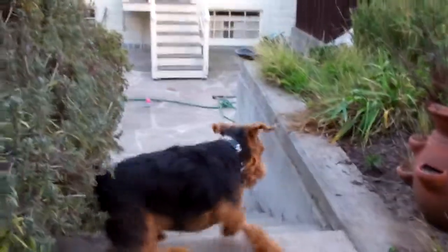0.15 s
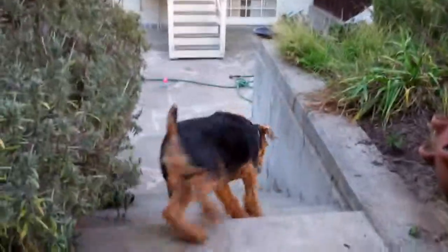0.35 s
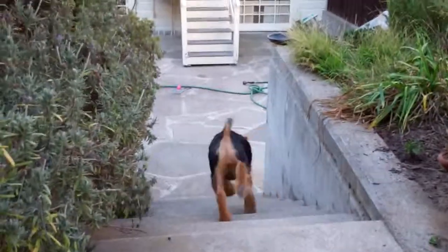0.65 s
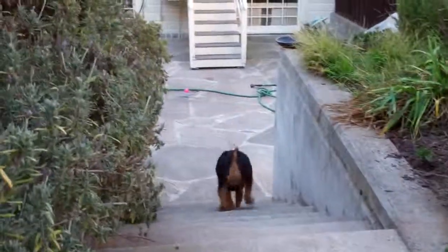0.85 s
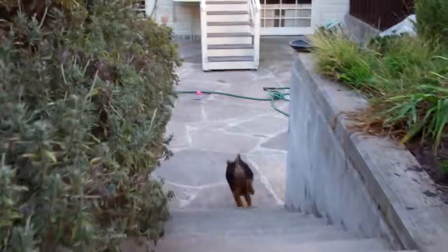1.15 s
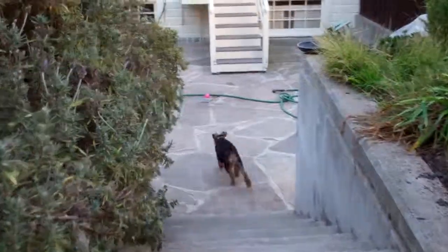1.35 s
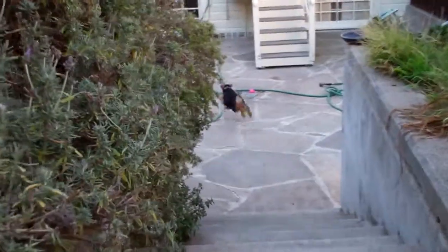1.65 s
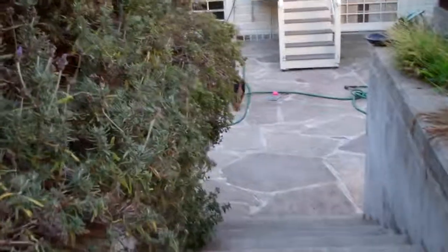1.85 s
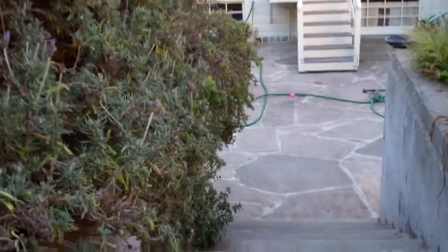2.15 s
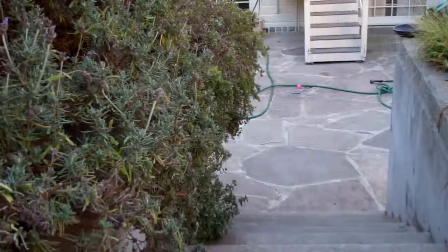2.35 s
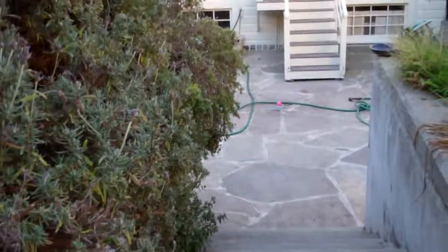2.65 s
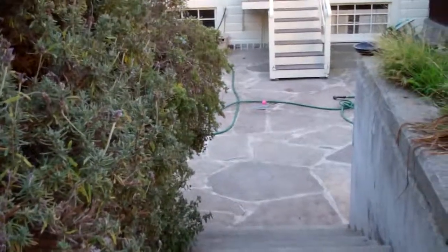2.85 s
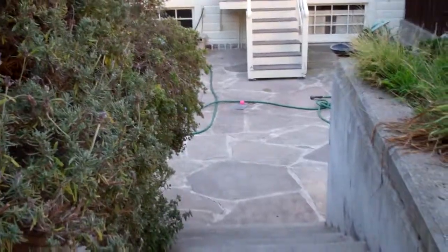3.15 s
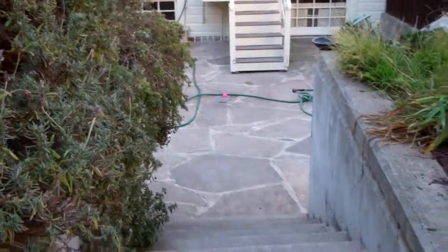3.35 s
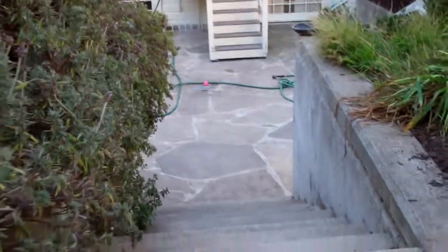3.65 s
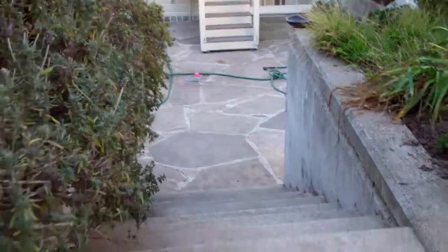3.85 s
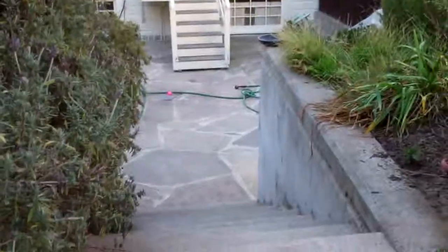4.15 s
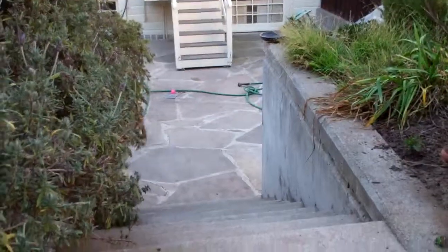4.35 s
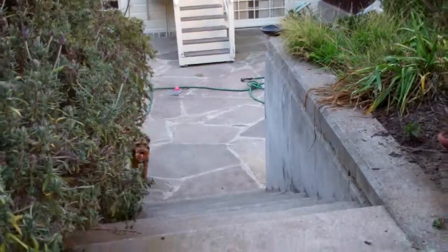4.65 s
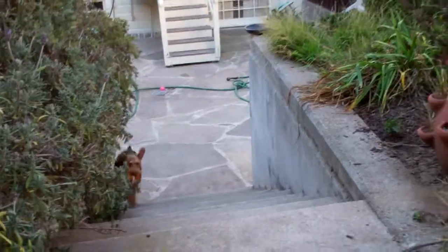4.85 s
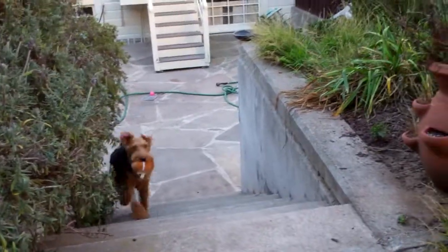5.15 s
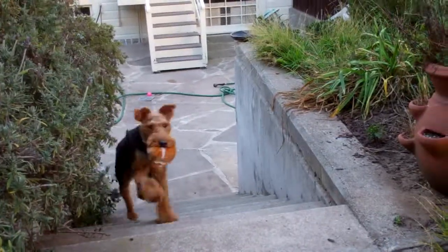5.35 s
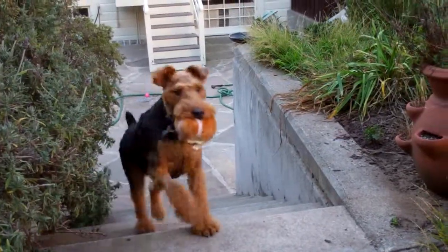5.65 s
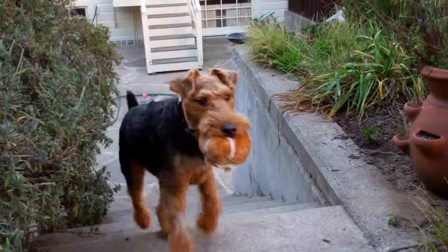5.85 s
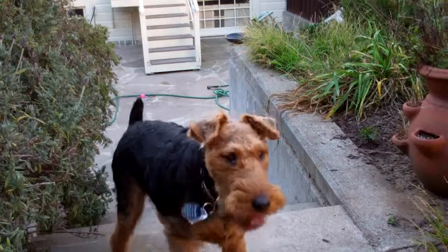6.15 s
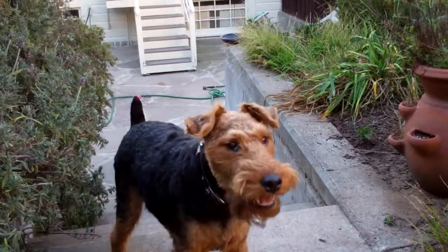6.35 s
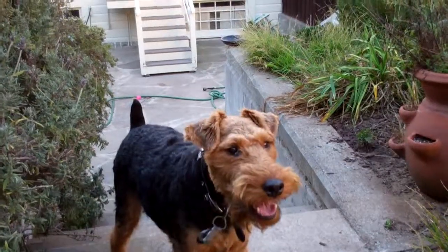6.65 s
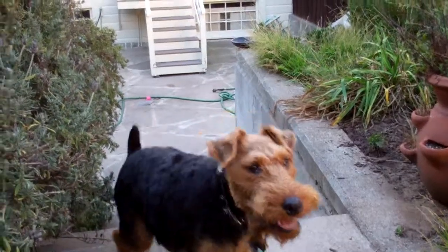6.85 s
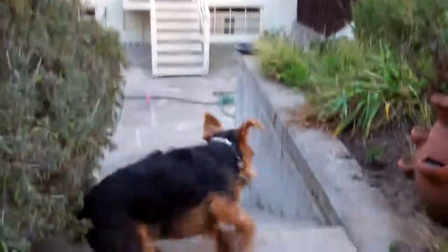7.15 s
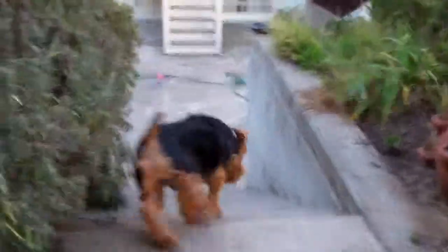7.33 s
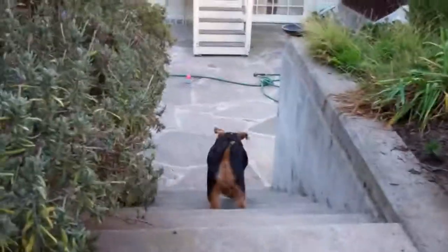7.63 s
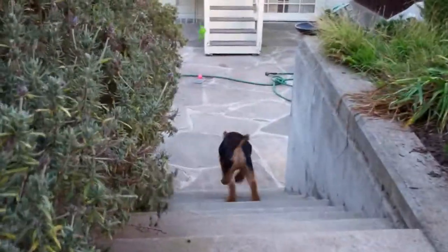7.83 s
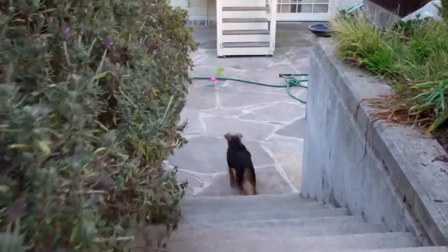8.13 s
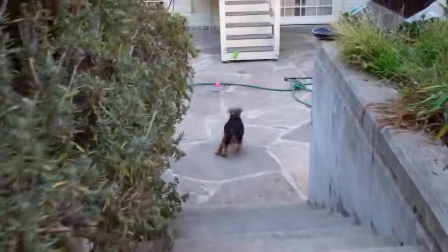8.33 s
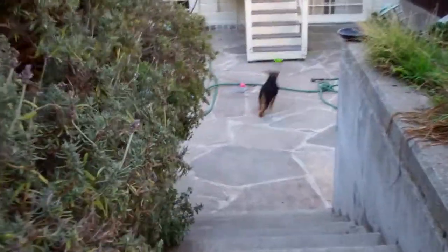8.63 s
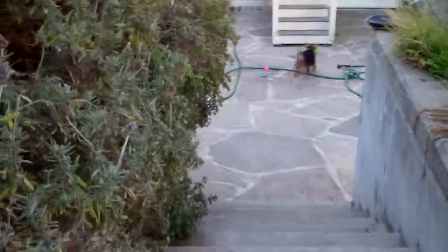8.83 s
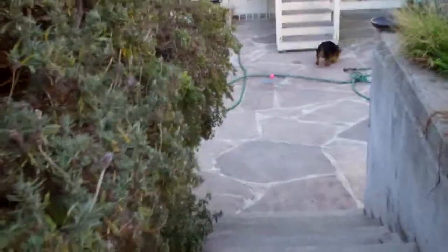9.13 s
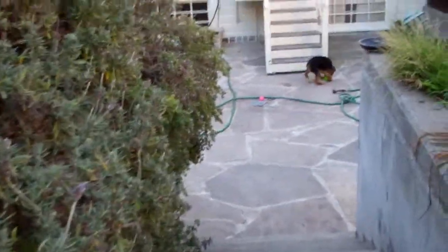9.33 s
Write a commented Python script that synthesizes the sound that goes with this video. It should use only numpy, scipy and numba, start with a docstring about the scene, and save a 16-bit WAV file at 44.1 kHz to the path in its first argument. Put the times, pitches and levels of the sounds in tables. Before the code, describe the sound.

High, thin jingling from a dog's collar tags stands out over faint distant traffic in a small yard. Claws click and paws brush gritty stone as the dog moves. About a third of the way in, a toy squeaks briefly, and then the dog yips once. After a busy run of clinks the tags rest for a moment, then rattle again with dull paw landings and a quick scrape.

```python
"""Metal collar tags clink and rattle over a hum of distant traffic, which dips briefly after loud bursts.
A terrier is fetching a toy up and down stone garden steps between a wall and a bush. The tags are struck
plates ringing in their modes; claws tick by impact and paws scuff by friction on the stone. The bitten toy
squeaks as air drives its reed, the dog yips once and skids once, and the yard adds a short reverberation."""
import sys
import numpy as np
from scipy import signal
from scipy.io import wavfile
from scipy.ndimage import uniform_filter1d
from numba import njit

SR = 44100
rng = np.random.default_rng(int(sys.argv[2]) if len(sys.argv) > 2 else 0)


def unload_wav(signal):
    """Save mono or channel-first audio to the path in sys.argv[1] as 16-bit WAV at rate SR, clipped to [-1, 1]."""
    wavfile.write(
        sys.argv[1],
        SR,
        np.round(np.clip(np.atleast_2d(signal).T, -1, 1) * 32767).astype(np.int16),
    )


N = 418509
TIME = np.arange(N) / SR


def undb(db):
    return 10 ** (np.asarray(db) / 20)


def unit(x):
    return x / np.sqrt(np.mean(x ** 2))


def noise(*shape):
    return rng.standard_normal(shape)


def band(x, lo_hz, hi_hz):
    sos = signal.butter(2, [lo_hz, min(hi_hz, .45 * SR)], "bandpass", fs=SR, output="sos")
    return signal.sosfilt(sos, x)


def phase_of(hz):
    return 2 * np.pi * np.cumsum(hz) / SR


def walk(rate):
    """Random modulation: values held for 1 / rate s and smoothed twice; spread near 1."""
    k = int(SR / rate)
    steps = np.repeat(noise(N // k + 1), k)
    return 1.7 * uniform_filter1d(uniform_filter1d(steps, k), k)[:N]


def grains(per_s, spread_db):
    """Shot noise: sparse stereo clicks, a few much larger than the rest; rms 1."""
    hit = rng.random(N) < per_s / SR
    size = hit * undb(spread_db * rng.exponential(size=N))
    return unit(size * (noise(N) + .5 * noise(2, N)))


def bursts(rows, slope_db, swell=0):
    """Envelope of (t/s, length/s, level/dB) rows, each changing by slope_db; swell slows long onsets."""
    gain = 0
    for start, length, db in rows:
        age = TIME - start
        gate = np.clip(np.minimum(age / (.00043 + swell * length ** 2), (length - age) / .0013), 0, 1)
        gain += undb(db + slope_db * np.clip(age / length, 0, 1)) * gate
    return gain


# Dips in level after loud bursts: t/s, depth/dB
LEVEL_DIPS = [(0.249, -11.5), (.49, -11.5), (.92, -5), (1.282, -5.5), (2.40, -2.5), (4.40, -3.5),
              (4.68, -4.5), (5.14, -4.5), (5.309, -8.5), (5.884, -10.5), (6.72, -1), (7.23, -5),
              (7.42, -4.5), (7.649, -4.5), (7.836, -10), (8.361, -9)]
def dips(fall_s=.0024, hold_s=.12, return_db_s=40):
    """Amplitude modulation: the gain drops at once, holds, then returns linearly in dB."""
    shapes = []
    for start, db in LEVEL_DIPS:
        recovery_db = return_db_s * np.maximum(TIME - start - hold_s, 0)
        shapes.append(np.clip((TIME - start) / fall_s, 0, 1) * np.minimum(db + recovery_db, 0))
    return undb(np.min(shapes, axis=0))


# Traffic spectrum: f/Hz, relative spectral density/dB
TRAFFIC_SPECTRUM = [(30, -50), (60, -5), (194, -3), (396, -5.5), (810, -1), (2230, -16), (2650, -18),
                    (6750, -26.5), (14500, -21.5)]
# Likeness of the two sides: f/Hz, left-right correlation
TRAFFIC_CORRELATION = [(30, 0.75), (100, 0.99), (300, .95), (700, 0.89), (2000, 0.42), (5000, 0.21),
                       (14000, 0.14)]
# Low hums: start t/s, end t/s, f/Hz, level/dB re the traffic
TRAFFIC_HUMS = [(1.0, 5.37, 82.95, -10), (6.1, 6.75, 208.4, -5)]
def traffic(level_db=-42):
    """Partial coherence: flickering half-octave noise bands, most alike in the bass, with faint hums."""
    def at_pitch(table, hz):
        freqs, values = np.transpose(table)
        return np.interp(np.log(hz), np.log(freqs), values)

    out = 0
    for hz in 56 * 2 ** np.arange(0, 8.1, .5):
        alike = at_pitch(TRAFFIC_CORRELATION, hz)
        mid, side = band(noise(2, N), hz / 2 ** .25, hz * 2 ** .25)
        pair = np.sqrt(1 + alike) * mid + np.sqrt(1 - alike) * np.array([side, -side])
        out += undb(at_pitch(TRAFFIC_SPECTRUM, hz) + 1.2 * walk(9)) * pair
    out /= np.sqrt(np.mean(band(out.mean(axis=0), 300, 1300) ** 2))  # unit rms in the midrange
    for start, end, hz, db in TRAFFIC_HUMS:
        swell = np.clip(np.minimum(TIME - start, end - TIME) / (.12 * (end - start)), 0, 1)
        out += undb(db + 2 * walk(8)) * swell * np.sin(phase_of(hz * (1 + .015 * walk(4))))
    return out * undb(level_db) * dips()


# Shakes of the collar: t/s, hold/s, level/dB
COLLAR_SHAKES = [(.15, 0.013, -28.5), (.32, 0.011, -23), (0.429, 0.037, -18.5), (.62, 0.0072, -22),
                 (0.737, 0.1, -28.5), (.905, 0.14, -27.5), (1.03, 0.41, -26), (1.52, 0.062, -30),
                 (1.735, 0.081, -27), (1.91, 0.016, -27.5), (2.029, 0.035, -24), (2.18, 0.011, -34.5),
                 (2.261, 0.4, -30.5), (2.81, 0.026, -28), (2.895, 0.065, -24.5), (3.109, 0.11, -23),
                 (3.412, 0.026, -29), (3.45, 0.029, -28), (3.71, 0.19, -37.5), (3.87, 0.042, -34),
                 (4.05, 0.021, -32.5), (4.11, 0.087, -31.5), (4.21, 0.015, -37), (4.359, 0.19, -26.5),
                 (4.47, 0.47, -29), (5.06, 0.4, -31.5), (7.2, 0.021, -26), (7.64, 0.49, -25.5),
                 (8.083, 0.19, -20.5), (8.358, 0.022, -16), (8.42, 0.26, -25), (8.612, 0.12, -26.5),
                 (8.78, 0.34, -27), (9.005, 0.1, -27.5), (9.17, 0.028, -23.5)]
def shaking_db(rest_db=-48.5, rise_db_s=790, fall_db_s=143):
    """Incoherent addition: shakes rise, hold and decay, summed in power; they dip with the traffic."""
    power = undb(2 * rest_db)
    for start, hold, db in COLLAR_SHAKES:
        onset_db = rise_db_s * np.maximum(start + .0041 - TIME, 0)
        decay_db = fall_db_s * np.maximum(TIME - start - hold, 0)
        power += undb(2 * (db - onset_db - decay_db))
    return 10 * np.log10(power * dips() ** 2)


# Paws scuffing over grit: t/s, length/s, level/dB, treble/dB re that level
PAW_SCUFFS = [(0.164, 0.067, -55, 5), (0.234, 0.026, -33.5, 13.5), (0.322, 0.017, -45.5, 12),
              (0.433, 0.022, -36, 15), (6.114, 0.059, -61, 21), (6.313, 0.013, -58, 19.5),
              (6.943, 0.065, -60, 24.5), (7.01, 0.16, -35, 13), (7.215, 0.072, -40.5, 13.5),
              (7.307, 0.044, -42.5, 10.5), (7.416, 0.018, -30.5, 13.5), (9.099, .07, -44.5, 14),
              (9.29, 0.15, -48, 20.5)]
# Dull landings: t/s, length/s, level/dB
PAW_LANDINGS = [(7.2, 0.03, -37.5), (8.108, 0.022, -28), (8.126, 0.035, -28), (8.158, 0.032, -32.5),
                (8.188, 0.076, -38), (8.625, 0.013, -29), (9.09, 0.076, -40.5)]
def paws(swell=3.4):
    """Friction and impact noise: scuffs are grit clicks over a hiss, landings a low, gritty rumble."""
    grit = (grains(4000, spread_db=2.5) + .45 * noise(2, N)) * undb(1.2 * walk(120))
    scuffs = [row[:3] for row in PAW_SCUFFS]
    # a duller scuff drags more of the pad, which sounds lower
    dull = [(start, length, db - treble_db + .5) for start, length, db, treble_db in PAW_SCUFFS]
    bright = [(start, length, db + treble_db) for start, length, db, treble_db in PAW_SCUFFS]
    body = bursts(scuffs, slope_db=-1, swell=swell) * unit(band(grit, 1760, 5500))
    drag = bursts(dull, slope_db=10, swell=swell) * unit(band(grit, 1560, 5200))
    treble = bursts(bright, slope_db=-3.5, swell=swell / 2) * unit(band(grit, 8200, 20000))
    # whenever the collar shakes the dog is moving, and the pads brush the stone
    brush = undb(shaking_db() - 19.5) * unit(band(grit, 1550, 7600))
    knocks = grains(1100, spread_db=3).mean(axis=0)
    rumble = unit(band(band(knocks, 110, 900), 140, 800))
    landings = bursts(PAW_LANDINGS, slope_db=-5) * (rumble + .3 * unit(band(grit, 1200, 4200)))
    return body + drag + brush - treble + landings


# Claws striking stone: t/s, relative level/dB, f/Hz
CLAW_TICKS = [(0.399, -30.5, 2760), (1.405, -11.5, 10500), (1.223, -23.5, 4500), (1.493, -21, 7050),
              (1.5777, -26.5, 4000), (1.787, -22.5, 2100), (4.332, -26, 6400), (4.554, -29, 7000),
              (4.615, -30.5, 7000), (4.656, -29, 8040), (5.016, -21, 6700), (6.223, -25.5, 7250),
              (6.616, -29, 7140), (6.721, -15, 5470), (6.8328, -28.5, 2480), (6.8496, -23, 6600),
              (6.8847, -25.5, 6570), (7.079, -15, 6600), (7.102, -17, 3840), (7.466, -31, 2700),
              (7.572, -31, 8040), (7.815, -14, 7900), (8.105, -18.5, 2660), (8.258, -25, 4500),
              (8.2918, -22.5, 4530), (8.339, -22, 6760), (8.627, -15, 6300)]
def claws(size=2048, decay_s=.0009):
    """Impact transients: each tick is a few ms of noise, coloured round its own pitch."""
    out, t = np.zeros((2, N + size)), TIME[:size]
    for start, db, hz in CLAW_TICKS:
        impact = (noise(size) + .057 * noise(2, size)) * t * np.exp(-t / decay_s)
        tick = band(impact, .55 * hz, 2.2 * hz)
        at = int(start * SR)
        out[:, at:at + size] += undb(db + 3) * tick / np.abs(tick).max()
    return out[:, :N]


# One hard skid: t/s, length/s, level/dB
PAW_SKID = [(8.938, 0.024, -20.5)]
def skid(from_hz=2600, to_hz=1133):
    """Sliding friction: bright grit fades while a rough tone falls in pitch and swells."""
    start, length, _ = PAW_SKID[0]
    hz = np.interp(TIME, [start, start + length], [from_hz, to_hz])
    slide = np.sin(phase_of(hz * (1 + .11 * walk(1500)))) * undb(2.7 * walk(600) - 7.5)
    grit = unit(band(grains(6500, spread_db=1.1), 1340, 4800))
    return bursts(PAW_SKID, slope_db=-1.5) * grit + bursts(PAW_SKID, slope_db=8) * slide


# One short yip: t/s, length/s, level/dB
DOG_YIP = [(4.074, 0.064, -31)]
def yip(band_hz=(1420, 2140)):
    """Narrow-band noise: a fading burst, heard as a rough pitch."""
    return bursts(DOG_YIP, slope_db=-14) * unit(band(band(noise(N), *band_hz), *band_hz))


# Squeak contours, one list each: t/s, f/Hz, relative level/dB, breathiness (0-1)
TOY_SQUEAKS = [
    [(2.525, 1370, -49, 0.34), (2.545, 1600, -49, 0.4), (2.562, 1860, -41.5, 0.32),
     (2.597, 1890, -32.5, 0.2), (2.606, 2320, -35, 0.24), (2.616, 2250, -31.5, 0.54),
     (2.624, 1930, -38, 0.76), (2.66, 1920, -41.5, 0.68), (2.70, 1900, -48, 0.6), (2.722, 1850, -50, 0.7)],
    [(2.722, 1200, -50, 0.3), (2.75, 1235, -46, 0.09), (2.79, 1295, -44, 0.14), (2.815, 1300, -41.5, 0.15),
     (2.86, 1300, -51, 0), (2.905, 1306, -55, 0.05)],
    [(3.035, 1300, -60, .4), (3.048, 1550, -39, .4), (3.058, 2200, -36, .4), (3.07, 3650, -35, .3),
     (3.08, 3750, -32, .12), (3.097, 4050, -32, .12), (3.10, 4550, -31, .08), (3.134, 4520, -35, .1),
     (3.14, 4500, -60, .2)],
    [(3.134, 2420, -46, 0.46), (3.142, 2280, -35.5, 0.74), (3.158, 1900, -41.5, 1), (3.20, 2060, -44.5, 1),
     (3.245, 2040, -57, 0.97)],
]
# Reed harmonics 1-11: relative level/dB
REED_HARMONICS = [0.0, -1, -4, -3, -8, -4, -13, -14, -14, -13, -13]
def toy():
    """Reed oscillation: strong harmonics, smeared by pitch jitter as air leaks past the reed."""
    hz, db, breath = np.zeros(N), np.full(N, -120.), np.zeros(N)
    for times, *columns in map(np.transpose, TOY_SQUEAKS):
        on = (TIME >= times[0]) & (TIME <= times[-1])
        hz[on], db[on], breath[on] = [np.interp(TIME[on], times, column) for column in columns]
    phase = phase_of(hz * (1 + .1 * breath * walk(1500) + .005 * walk(150)))
    reed = 0
    for k, harmonic_db in enumerate(REED_HARMONICS, 1):
        ceiling_hz = 14000 - 12000 * breath if k > 6 else 8500
        reed += undb(harmonic_db + 2.57 * walk(150)) * np.sin(k * phase) * (k * hz < ceiling_hz)
    leak = unit(band(band(noise(N), 6000, 7500), 6000, 7800))
    gain = undb(db + .3 * walk(120))
    hiss = unit(band(noise(N), 1200, 9400))
    return gain * (2.18 * reed + 3.6 * breath * leak + .92 * hiss)


def contact_clicks(at, db, decay_s, lo_hz):
    """Impulsive excitation: each brief contact gives a broadband click that decays exponentially."""
    pulses = np.zeros(N)
    np.add.at(pulses, at, undb(db))
    envelope = signal.lfilter([1], [1, -np.exp(-1 / (decay_s * SR))], pulses)
    return band(envelope * (noise(N) + .98 * noise(2, N)), lo_hz, 20400)


@njit
def add_mode(out, at, pole, push):
    """Damped oscillation: each blow adds a sinusoid to out, run until it is 40 dB down."""
    for k in range(len(at)):
        z, i = 1. + 0j, at[k]
        while i < out.shape[1] and z.real ** 2 + z.imag ** 2 > 1e-4:
            out[0, i] += (push[k, 0] * z).imag
            out[1, i] += (push[k, 1] * z).imag
            z, i = z * pole[k], i + 1


def plate(at, db, modes, scatter_db, t60_scale, detune):
    """Modal superposition: each blow lands elsewhere and shares its energy anew among the modes."""
    out, mode_db = np.zeros((2, N)), np.array(modes)[:, 1]
    # the tag then hangs freely or lies damped on its neighbour
    freedom = t60_scale * np.exp(.5 * np.minimum(noise(len(at)), 1))
    shares = undb(mode_db + scatter_db * np.minimum(noise(len(at), len(modes)), 1.3))
    shares *= np.linalg.norm(undb(mode_db)) / np.linalg.norm(shares, axis=1, keepdims=True)
    for (hz, _, t60), share in zip(modes, shares.T):
        chance = noise(len(at), 6)
        pitch_hz = hz * (1 + detune * chance[:, 0])
        damping = np.log(1000) / np.clip(t60 * freedom, .005, .4)
        pole = np.exp((2j * np.pi * pitch_hz - damping) / SR)
        # a swinging plate beams each mode differently to the two sides
        sides = undb(.68 * chance[:, 4:6]) * np.exp(1j * (3 * chance[:, 1:2] + 1.09 * chance[:, 2:4]))
        add_mode(out, at, pole, (undb(db) * share)[:, None] * sides)
    return out


# Lower modes and top cluster of the tags: f/Hz, relative level/dB, nominal T60/s
LOW_MODES = [(3940, -17, 0.044), (4430, -25.5, 0.096), (5540, -23.5, 0.13), (6130, -21, 0.12),
             (6936, -2, 0.031), (7490, -11, 0.044), (7910, 1, 0.011), (8240, -0.5, 0.053),
             (8660, 1, 0.0069), (9120, -8, 0.059), (9375, -4, 0.066), (10070, -13, 0.069),
             (11520, -8, 0.015)]
TOP_MODES = [(13150, -9, .04), (13380, -6, .04), (13580, -2, .05), (13720, 0.0, .05), (13880, -2, .05),
             (14050, -6, .04)]
# Tags striking each other: t/s, relative level/dB, offset of the lower modes/dB
TAG_STRIKES = [(0.163, -18, -11), (0.4794, -12, -7), (0.772, -15, -31.5), (0.795, -13.5, -10.5),
               (0.9144, -9, -10.5), (0.926, -13, -10), (1.159, -20.5, -6), (1.2777, -5, -5.5),
               (1.3825, -11, -9), (1.75, -21, -14.5), (1.934, -17.5, -13), (2.397, -5, -13.5),
               (2.9126, -8.5, -11), (3.453, -23, -4.5), (4.067, -16, -17), (4.118, -18.5, -7.5),
               (4.3938, -2.5, -13), (4.468, -22, -2), (4.6752, -12, -9), (4.838, -23, -4),
               (5.067, -18.5, -2), (5.14, -8.5, -8), (5.147, -23, -18), (5.235, -27, -5), (5.252, -21, -8),
               (5.278, -22.5, -3), (5.308, -13.5, -3), (5.318, -9.5, -11), (5.487, -30, 0),
               (5.509, -18, -9), (5.522, -17, -16), (5.5999, -20.5, -6.5), (5.683, -13, -10),
               (5.6995, -17, 0.5), (5.742, -20, -8), (5.7815, -13, -8.5), (5.8311, -11, -8.5),
               (5.883, -4.5, -20), (5.89, -17, -8), (5.902, -20.5, -2), (7.2275, -15, -6),
               (7.4726, -19.5, -34.5), (7.648, -8.5, -13.5), (7.8337, -10, -11.5), (8.084, -20, -2),
               (8.171, -10.5, -8), (8.358, -15.5, -25), (8.6286, -14.5, -13), (9.0096, -20.5, -1)]
def tag_strikes():
    """Free vibration of struck plates: two equal blows 1.5 ms apart and one weaker rebound each ring briefly."""
    start, db, low_db = np.transpose(TAG_STRIKES)
    delay, loss = rng.random((len(start), 2)).T
    at = (np.r_[start, start + .0015, start + .004 + .012 * delay] * SR).astype(int)
    db, low_db = np.r_[db - 3.5, db - 3.5, db - 9 - 8 * loss], np.tile(low_db, 3)
    top = plate(at, db + 4, TOP_MODES, scatter_db=13, t60_scale=.18, detune=.0046)
    low = plate(at, db + low_db + 1.5, LOW_MODES, scatter_db=6.5, t60_scale=.66, detune=.0035)
    clicks = contact_clicks(at, db + low_db / 3 - 14.5, decay_s=.0015, lo_hz=3460)
    return band(top + low + clicks, 4800, .45 * SR)


def tag_chatter(touches=2300):
    """Random excitation: the shaken tags touch often, too lightly to stir the four deepest modes."""
    at = rng.integers(0, N, size=touches)
    db = shaking_db()[at] + 1.18 * walk(40)[at] - 9
    db += 1.74 * np.minimum(rng.exponential(size=touches), 4)
    top = plate(at, db - 1, TOP_MODES, scatter_db=15, t60_scale=1.18, detune=.007)
    low = plate(at, db - 5, LOW_MODES[4:], scatter_db=12, t60_scale=1.37, detune=.0035)
    return top + low + contact_clicks(at, db - 3, decay_s=.003, lo_hz=6460)


def scene(yard_t60_s=.25, yard_db=-8.5):
    """Diffuse reflection: wall, steps and house front give the dog's sounds a tail; traffic lies behind."""
    dog = tag_strikes() + tag_chatter() + claws() + paws() + toy() + yip() + skid()
    t = TIME[:SR // 2]
    tail = unit(noise(2, len(t)) * undb(-60 * t / yard_t60_s) * (t > .004)) / np.sqrt(len(t))
    return dog + undb(yard_db) * signal.fftconvolve(dog, tail, axes=1)[:, :N] + traffic()


def record(dry, first_cutoff_hz=14190, last_cutoff_hz=15520):
    """Band limiting and saturation: loud peaks are rounded between two steep low-pass filters."""
    limited = signal.sosfilt(signal.ellip(10, .3, 85, first_cutoff_hz, fs=SR, output="sos"), dry)
    rounded = np.tanh(.4 * limited) / .4
    return signal.sosfilt(signal.ellip(10, .2, 80, last_cutoff_hz, fs=SR, output="sos"), rounded)


dry = scene()
out = record(dry)
unload_wav(out)
```